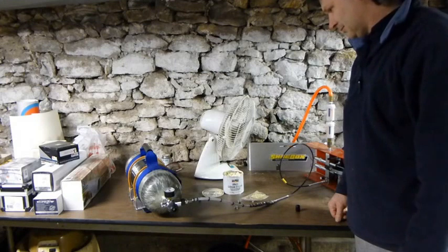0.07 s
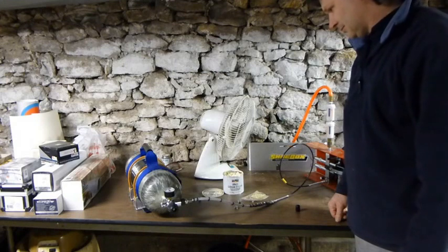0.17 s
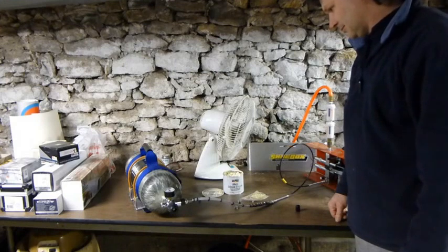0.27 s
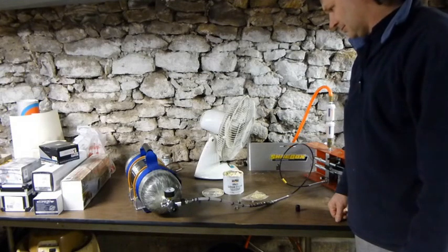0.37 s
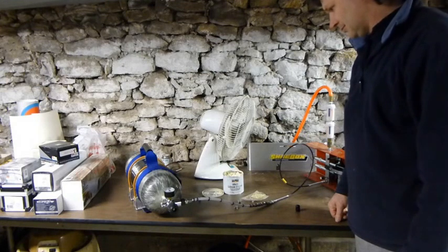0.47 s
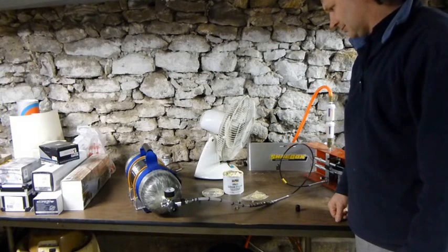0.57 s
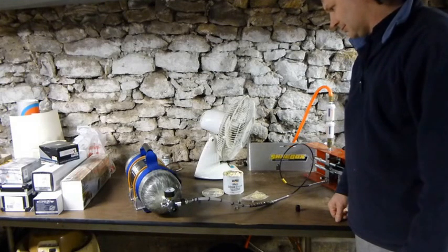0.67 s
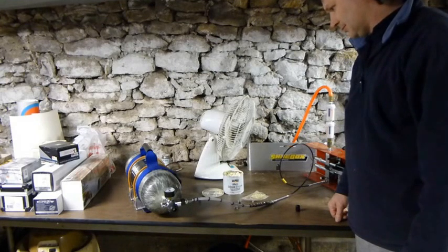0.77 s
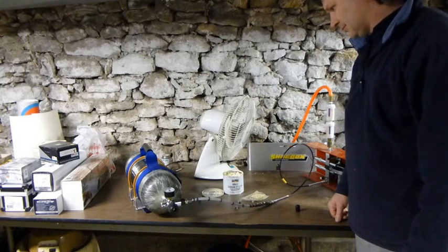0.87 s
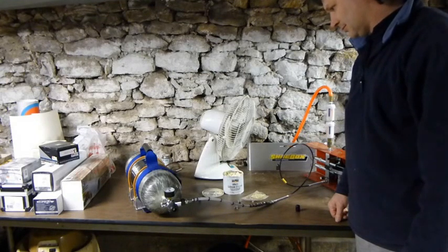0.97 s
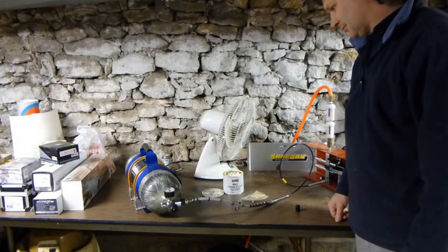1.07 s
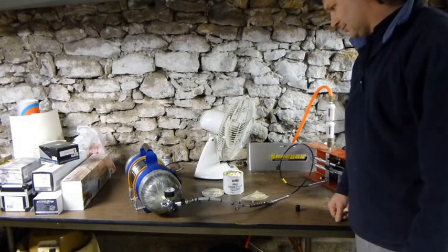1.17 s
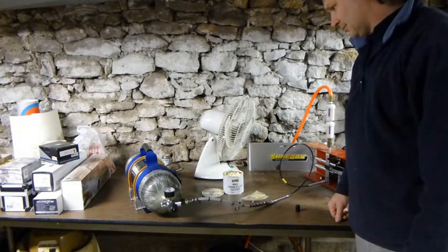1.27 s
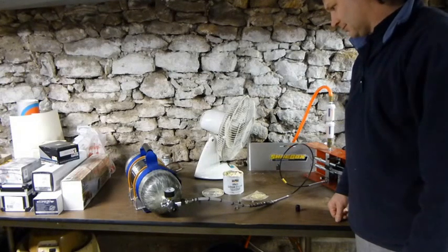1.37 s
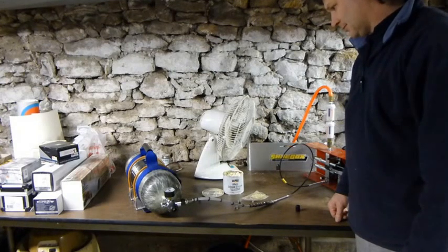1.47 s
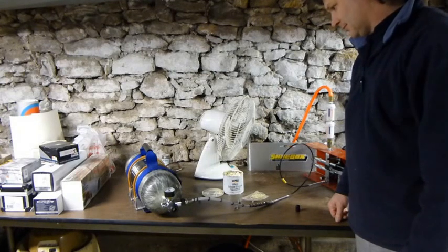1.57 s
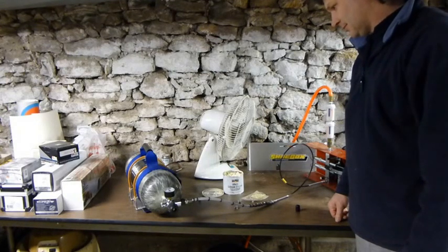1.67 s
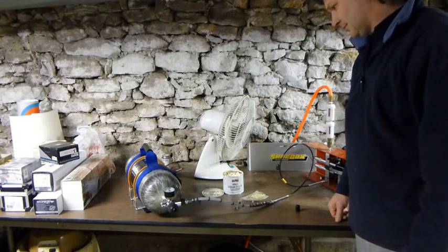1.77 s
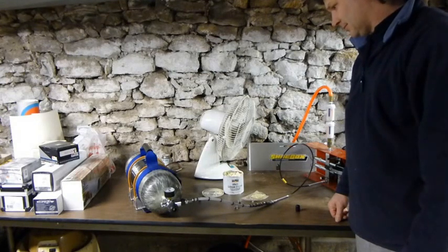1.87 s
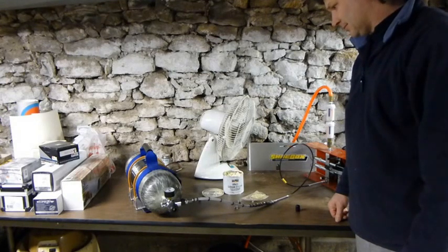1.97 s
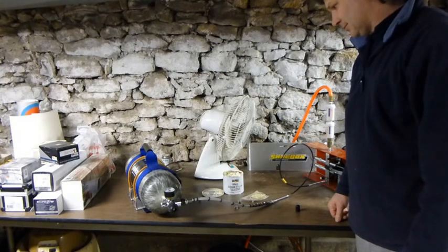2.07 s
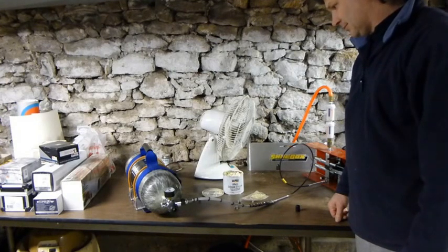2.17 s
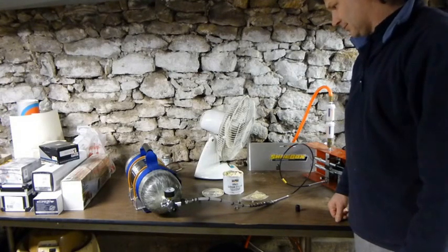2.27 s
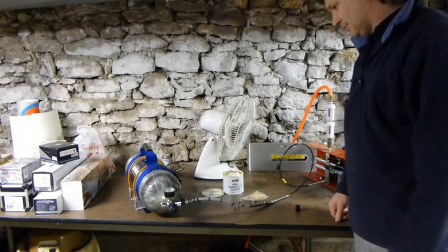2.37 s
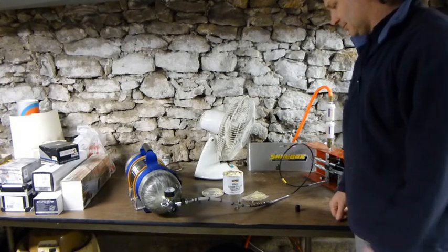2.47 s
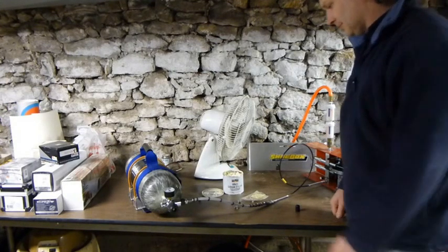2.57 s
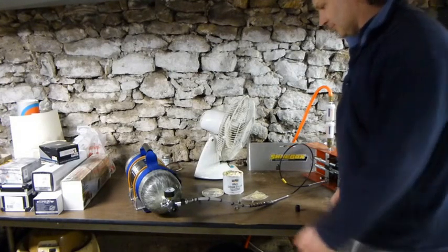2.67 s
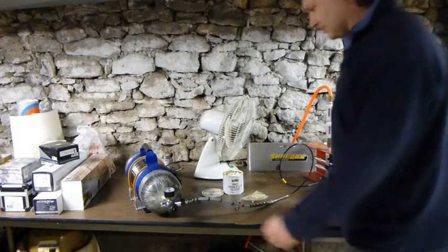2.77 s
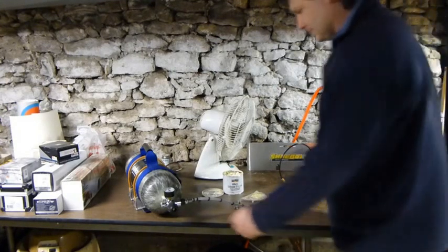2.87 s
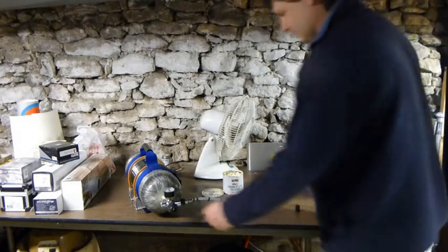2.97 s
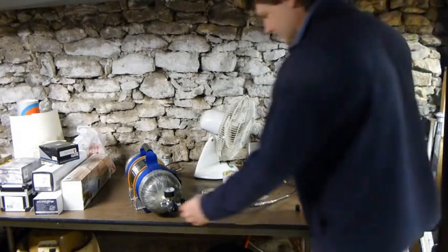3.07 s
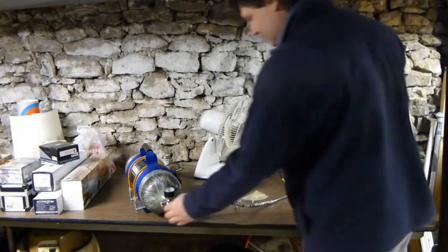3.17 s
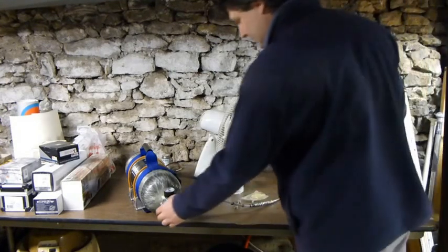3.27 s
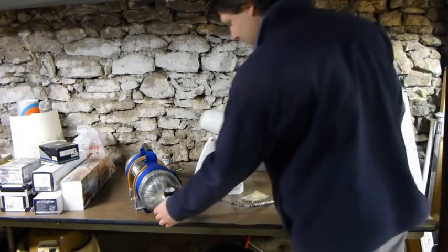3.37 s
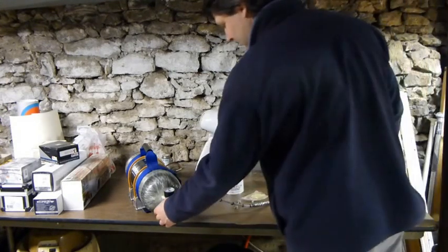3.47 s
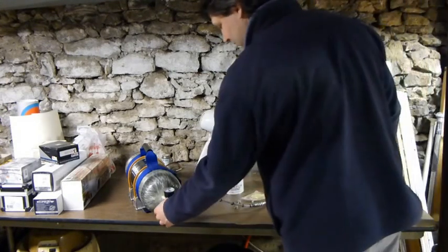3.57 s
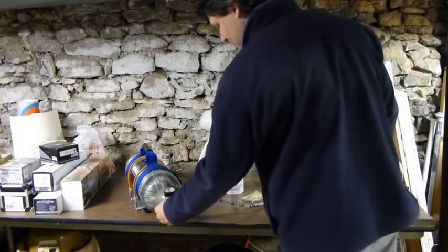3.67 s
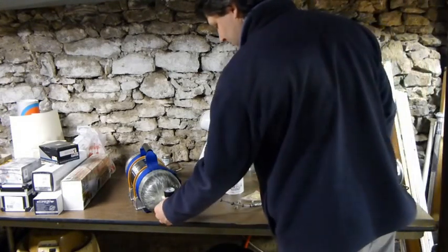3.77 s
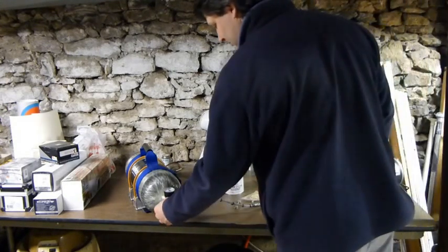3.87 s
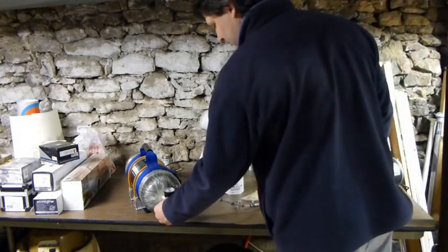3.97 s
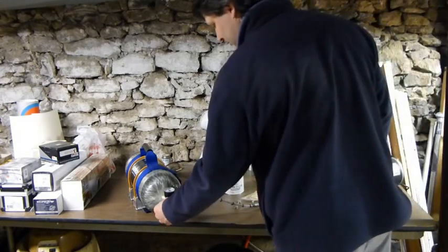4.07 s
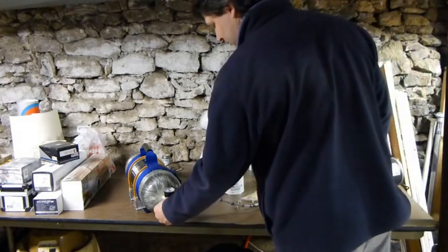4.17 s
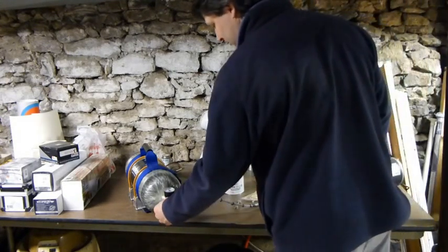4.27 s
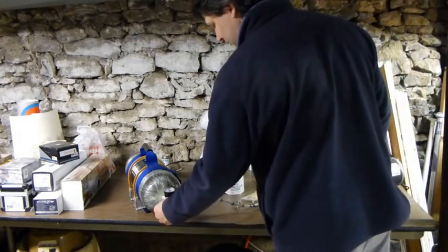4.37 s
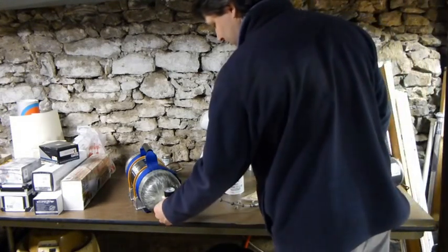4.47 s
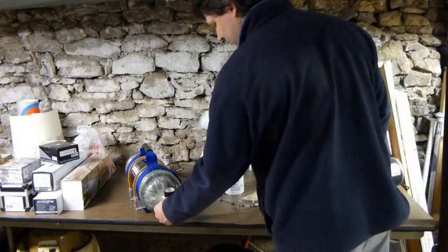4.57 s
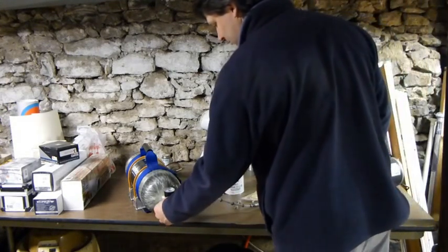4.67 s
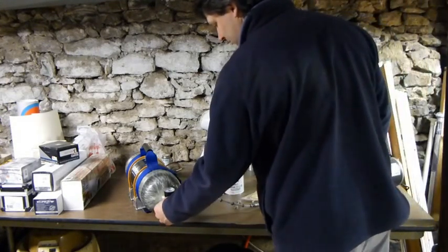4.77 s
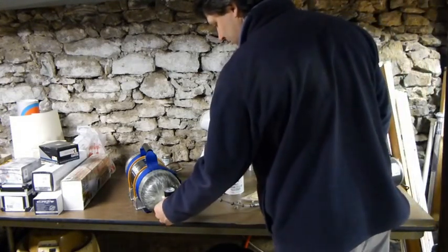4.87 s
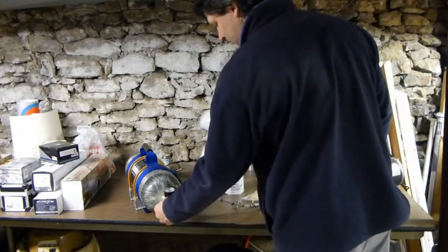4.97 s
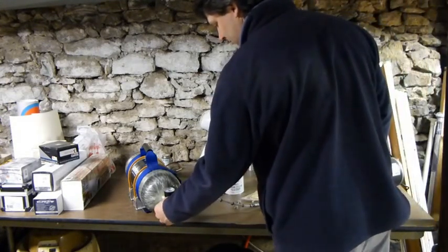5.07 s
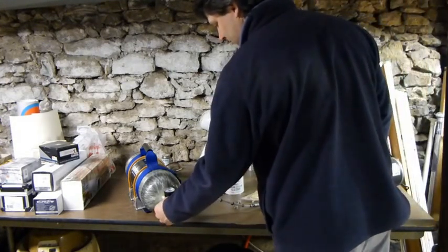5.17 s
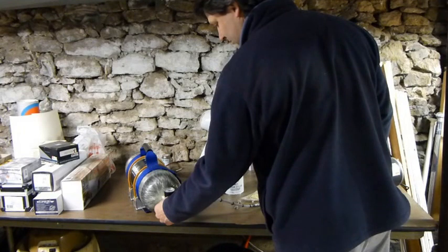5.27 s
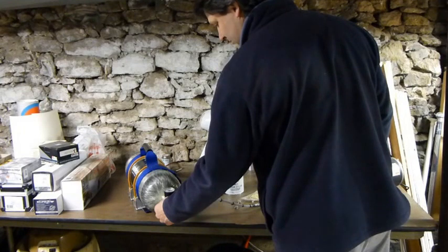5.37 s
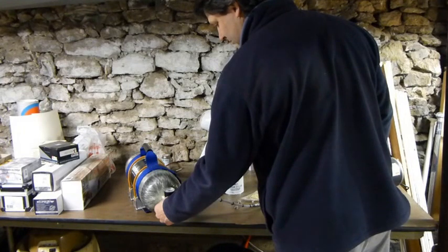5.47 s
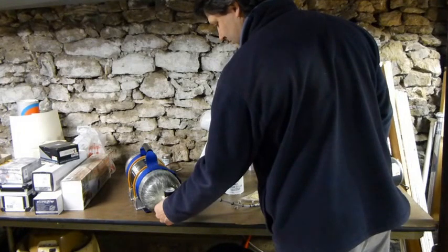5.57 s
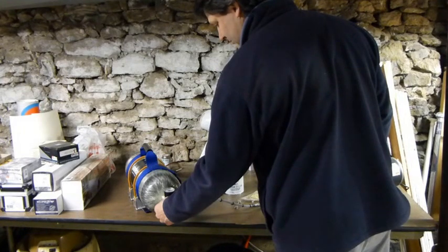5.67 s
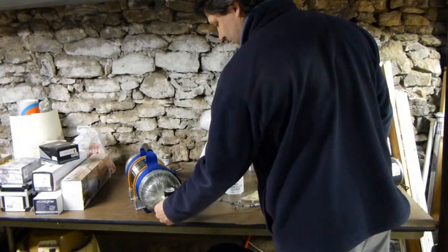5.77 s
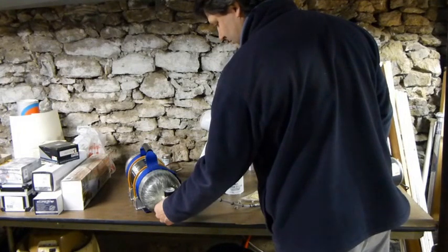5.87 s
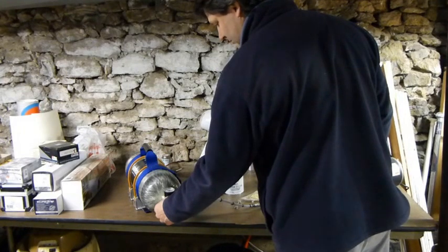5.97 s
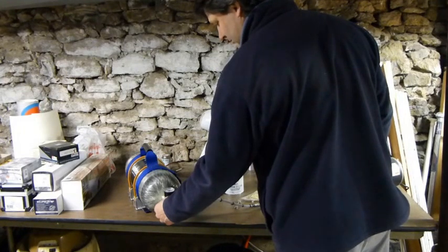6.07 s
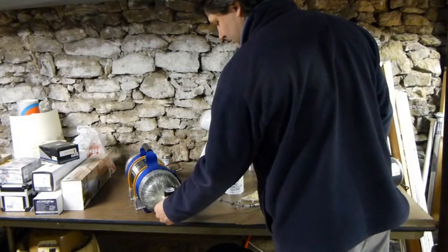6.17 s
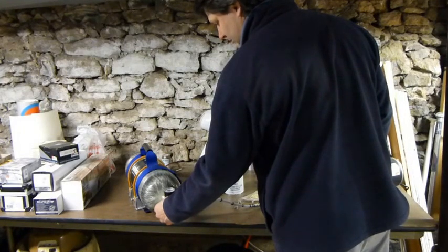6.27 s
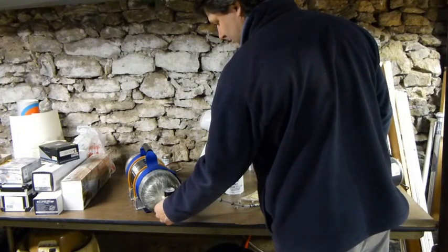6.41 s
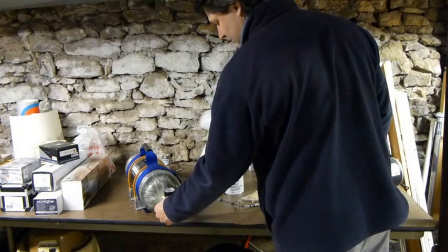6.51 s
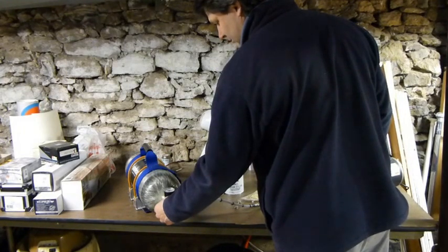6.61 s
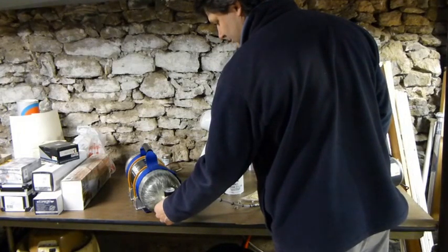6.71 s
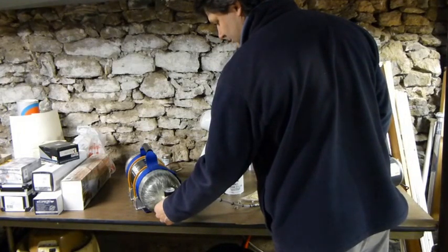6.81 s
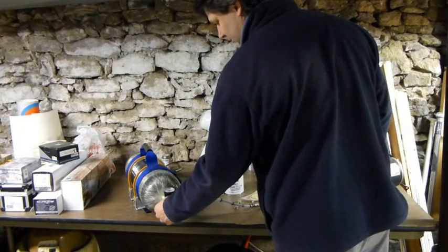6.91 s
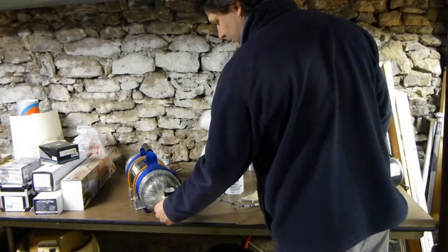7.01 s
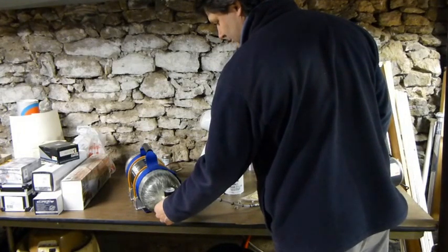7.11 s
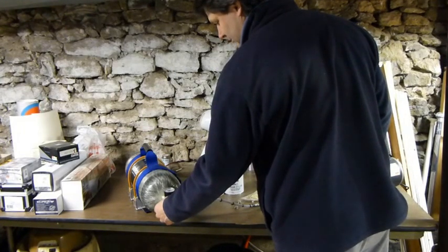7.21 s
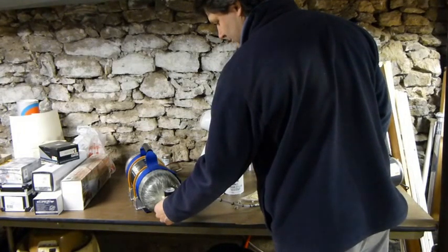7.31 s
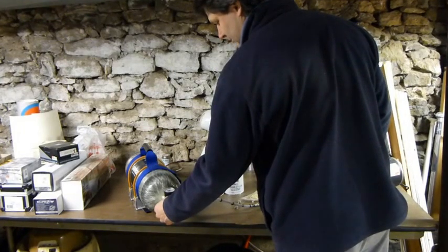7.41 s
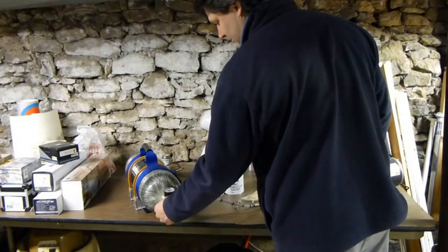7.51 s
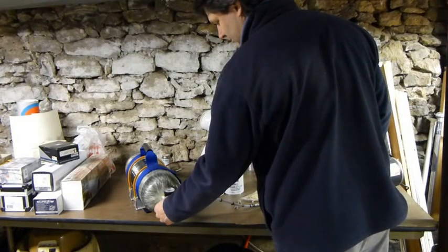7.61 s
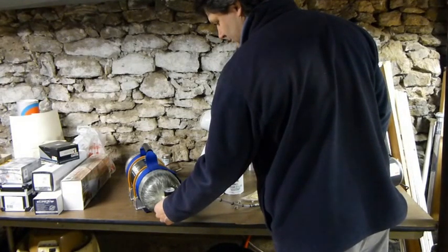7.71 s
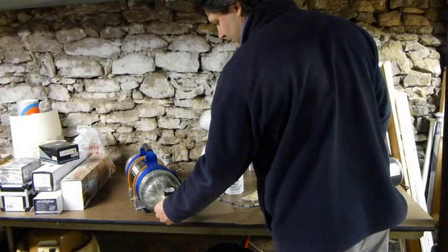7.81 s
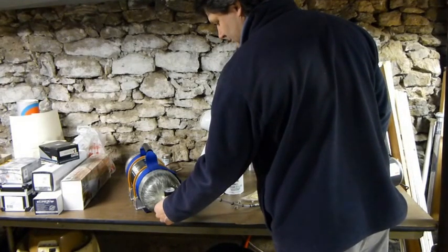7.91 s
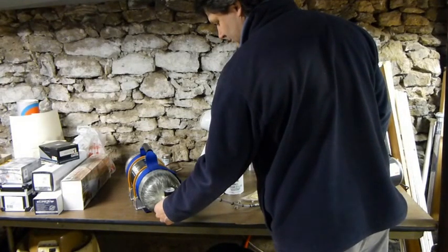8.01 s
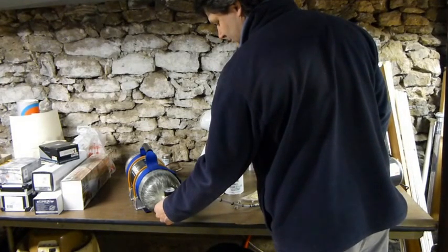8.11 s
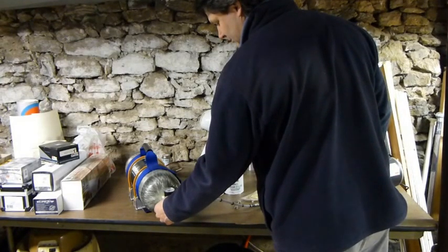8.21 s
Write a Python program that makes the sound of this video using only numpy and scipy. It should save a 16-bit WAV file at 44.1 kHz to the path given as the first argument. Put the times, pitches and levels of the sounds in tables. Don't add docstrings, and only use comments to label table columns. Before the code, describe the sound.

A camera microphone sits near the bench in a stone-walled workshop with a short, close reverberation. From 0 s a thin, fairly quiet leak of compressed air hisses, with small wet spits at about 0.3, 0.5, 0.8, 1.1 and 1.7 s. It eases steadily, dropping faster after 2 s and nearly spent by 4 s. Shoes scuff a gritty floor: a soft scuff at 2.5 s, quick steps around 2.9-3.1 s, then a longer drag until 3.6 s. At 4.1 s a valve opens and a loud, bright, turbulent jet starts within a tenth of a second. It sags slightly by 5 s, holds, then weakens clearly after 6.1 s, with small surges at 6.7, 7.75 and 8.2 s, remaining a softer hiss at the end. A faint high whistle colours the air; a weak motor hum and dull room air lie beneath.

```python
import sys
import numpy as np
from scipy import signal
from scipy.fft import rfft, irfft
from scipy.io import wavfile

SR = 44100
rng = np.random.default_rng(int(sys.argv[2]) if len(sys.argv) > 2 else 0)


def put_to_file(sound):
    columns = np.atleast_2d(sound).T
    safe = np.clip(columns, -1, 1)
    whole_steps = np.round(safe * 32767)
    wavfile.write(sys.argv[1], SR, whole_steps.astype(np.int16))


def boost(x):
    u = np.asarray(x, float) / 20
    return 10 ** u


N = 363825
SECONDS = np.arange(N) / SR

# time_s, level_db
TANK_PRESSURE = [
    (4.2, 1),
    (4.35, -0.1),
    (4.95, -2),
    (5.5, -1.74),
    (6.1, -2.5),
    (6.6, -6.5),
    (7.2, -9.5),
    (7.65, -12),
    (8.25, -13),
]


def tank_pressure_db():
    return in_time(TANK_PRESSURE)


def opening_db(lag_s):
    open_s, opening_s, curve = 4.098, 0.09, 1.6
    turned = np.clip((SECONDS - open_s - lag_s) / opening_s, 1e-3, 1)
    return 40 * curve * np.log10(np.sin(np.pi / 2 * turned))


# freq_hz, density_db (per Hz)
BLEED_HISS = [(320, -57.5), (540, -33), (660, -17.5), (760, -24.5), (850, -14.5), (960, -22), (1200, -17.5),
              (2340, -13.5), (3500, -7), (4900, -3), (6100, 1), (9000, 5), (12600, 4.5), (15400, -3)]
# centre_hz, width_hz, peak_db
BLEED_REFLECTIONS = [(1100, 300, -3.4), (1388, 95, 4.1), (1651, 87, 4.2), (1760, 45, -5.5), (1865, 45, 6.0),
                     (2294, 45, -6.3), (2736, 57, -4.1), (2856, 58, 5.0), (3425, 45, -5.4),
                     (3734, 45, -3.4), (3858, 77, 3.4), (4843, 57, 8.0), (5885, 45, -5.8), (6965, 45, 5.3),
                     (7527, 45, -6.2), (7997, 45, 5.6), (8734, 53, -5.4), (8982, 190, 3.8),
                     (9711, 45, -5.4), (11381, 62, 6.1), (11541, 64, -4.6), (11682, 45, 5.4),
                     (12289, 45, 5.5), (12416, 45, -5.2), (12559, 92, -5.4), (12720, 45, 4.0),
                     (12825, 63, -4.9), (13001, 92, 8.6), (13735, 55, -6.2), (14165, 68, 5.7)]
# start_db, follow_share (of the pressure fall), shift_db (per dB of pressure above choking)
BLEED_RESPONSE = [(-52.5, 0.7, 0), (-51.5, 0.63, 0.014), (-42.5, 0.48, 0.91), (-34.5, 0.9, 0.093),
                  (-34.5, 1.12, 0), (-33.5, .6, 0.13)]
BLEED_LAGS = [0.0047, 0.0051, -0.0014, 0.0055, 0.0066, 0.001]
# time_s, boost_db
VALVE_SURGES = [
    (6.7, 0.8),
    (7.36, 0.3),
    (7.75, 2.5),
    (8.19, 2.5),
]


def bleed_jet():
    surge_db = swells_db(VALVE_SURGES, half_s=0.078)
    surge_shares = [.1, 0.34, 1, 0.96, 0.55, 0.22]
    pressed_db = band_levels(tank_pressure_db(), BLEED_RESPONSE, choke_db=-2.5)
    levels_db = []
    for level_db, lag_s, share in zip(pressed_db, BLEED_LAGS, surge_shares):
        levels_db.append(level_db + opening_db(lag_s) + share * surge_db)
    return jet(levels_db, BLEED_HISS, BLEED_REFLECTIONS, flutter_db=.45, patchy_db=.5)


# time_s, level_db
LINE_PRESSURE = [
    (0, 0),
    (.8, -1.8),
    (1.8, -4.5),
    (2.5, -8.5),
    (3.0, -11),
    (3.45, -14),
    (3.68, -16.5),
    (3.95, -19),
    (4.3, -18),
]
# freq_hz, density_db (per Hz)
LEAK_HISS = [(400, -37), (700, -15.5), (1700, -7), (2500, -5.5), (3000, -2), (3900, 0), (5500, -3),
             (6200, -11), (7700, -12), (10800, -11.5), (12000, -10), (13600, -4.5), (14700, 2), (15600, -5)]
# centre_hz, width_hz, peak_db
LEAK_REFLECTIONS = [(1734, 45, -5.4), (2347, 71, 5.5), (2714, 45, -5.9), (2811, 45, 6.2), (3063, 45, -5.8),
                    (3209, 87, 5.5), (3826, 45, 9.4), (3934, 77, -5.6), (4833, 45, 5.2), (5143, 45, -7.2),
                    (5397, 51, 4.8), (5681, 141, 5.0), (6314, 69, -13.2), (7114, 45, 5.4), (7310, 45, 6.9),
                    (7509, 96, -7.7), (8923, 187, 4.5), (10563, 55, 4.5), (10846, 45, -7.7),
                    (11066, 89, -5.4), (11295, 88, 4.6), (11681, 45, 7.9), (12024, 118, -3.6),
                    (12215, 129, 3.8), (12349, 45, -4.7), (12862, 61, -5.1), (13291, 45, -5.8),
                    (14415, 68, 5.3), (14833, 58, 5.5), (15149, 70, -6.9)]
# start_db, follow_share (of the pressure fall), shift_db (per dB of pressure above choking)
LEAK_RESPONSE = [(-59.5, 0.74, -1.4), (-51, 0.94, -2.5), (-49, 0.93, -1.43), (-52.5, 0.91, 0),
                 (-52.5, 1.07, 0.5), (-47.5, 0.95, 0.7)]
# time_s, boost_db
DROPLETS = [
    (.295, 3.5),
    (.535, 5.5),
    (.81, 2.5),
    (.855, 4),
    (1.11, 2.5),
    (1.69, 4),
    (1.74, 0),
    (2.28, 2),
]


def leak_jet():
    spit_db = swells_db(DROPLETS, half_s=0.016)
    spit_shares = [0.29, .9, 1, 0.43, .15, .1]
    pressed_db = band_levels(in_time(LINE_PRESSURE), LEAK_RESPONSE, choke_db=-4)
    levels_db = [level_db + share * spit_db for level_db, share in zip(pressed_db, spit_shares)]
    return jet(levels_db, LEAK_HISS, LEAK_REFLECTIONS, flutter_db=.35, patchy_db=.3)


def band_levels(pressure_db, bands, choke_db):
    choked_db = np.maximum(pressure_db - choke_db, 0)
    return [start_db + follows * pressure_db + shift * choked_db for start_db, follows, shift in bands]


def swells_db(events, half_s):
    return sum(boost_db * np.exp(-((SECONDS - s) / half_s) ** 2) for s, boost_db in events)


JET_EDGES = [2400, 3600, 5900, 10500, 13400]


def jet(levels_db, colour, comb, flutter_db, patchy_db):
    hz, gain = response(colour, comb)
    sound = stereo_noise(side_db=-11.5, tilt_db=-1.4) * gain * workshop(wet_db=-7.0, t60=.17)
    above = [1, *(1 / (1 + (edge / hz) ** 40) for edge in JET_EDGES), 0]
    flow_db = flutter_db * (drift(7) + .6 * drift(25))
    out = 0
    for low, high, level_db in zip(above, above[1:], levels_db):
        band = rms_one(irfft(sound * (low - high), N))
        out = out + band * boost(level_db + flow_db + patchy_db * drift(6.7))
    return out


def workshop(wet_db, t60):
    decay = boost(-60 * np.minimum(SECONDS, 2) / t60)
    tail = rng.standard_normal(N) * decay * (SECONDS > .004)
    return 1 + boost(wet_db) * rfft(tail / np.sqrt(np.sum(tail ** 2)))


def whistle():
    hz = np.fft.rfftfreq(N, 1 / SR)
    resonance = 1 / (1 + (2 * (hz - 2860) / 70) ** 2)
    tone = rms_one(irfft(stereo_noise(side_db=-13.0) * resonance, N))
    from_s, rise_s = 1.1, 1.1
    seep = np.clip((SECONDS - from_s) / rise_s, 0, 1) * boost(-72.5)
    blown = boost(-62 + tank_pressure_db() + opening_db(0))
    return (seep + blown) * tone


# freq_hz, density_db (per Hz)
GRIT_COLOUR = [(120, -52), (200, -16), (312, -7.5), (383, -31), (504, -6.5), (858, -13), (1050, -20),
               (1700, -14.5), (2020, -17), (4010, -16), (12000, -24), (15600, -49), (22000, -120)]
# centre_hz, width_hz, peak_db
SOLE_RESONANCES = [(485, 68, 13.5), (634, 36, 11), (1054, 38, 13.5), (1190, 86, 10), (1411, 42, 16),
                   (1816, 40, 10), (2230, 60, 11.5)]
# start_s, length_s, grit_db, thud_db (against grit), rub_db (against grit)
SHOE_STROKES = [
    (2.476, .15, -57.5, -12, -9),
    (2.865, 0.096, -53.5, -9, -6),
    (2.947, .065, -54, -3, -6),
    (3.018, 0.075, -59, -3, -1.5),
    (3.153, 0.49, -51, -8, -5.5),
]


def shoes():
    hz, gain = response(GRIT_COLOUR, SOLE_RESONANCES)
    sound = stereo_noise(side_db=-14.0) * gain
    over_thud, over_rub = (1 / (1 + (edge / hz) ** 8) for edge in (750, 2000))
    shares = [1 - over_thud, over_thud - over_rub, over_rub]
    thud, rub, grit = (rms_one(irfft(sound * share, N)) for share in shares)
    grain = boost(1.5 * drift(40))
    out = 0
    for start_s, length_s, grit_db, thud_db, rub_db in SHOE_STROKES:
        drag = stroke(start_s, length_s, fade_db=-12) * (grit + boost(rub_db) * rub)
        weight = stroke(start_s + 0.022 * length_s, length_s, fade_db=-19) * boost(thud_db) * thud
        out = out + boost(grit_db) * (drag + weight)
    return grain * out


def stroke(start_s, length_s, fade_db):
    press_share, lift_share = 0.26, 0.2
    done = (SECONDS - start_s) / length_s
    press = np.clip(done / press_share, 0, 1)
    lift = np.clip((1 - done) / lift_share, 0, 1)
    return press * lift * boost(fade_db * np.clip(done - press_share, 0, 1))


# pitch_hz, level_db (rms)
MOTOR_LINES = [(118.4, -82), (236.9, -84), (355.3, -82), (414.5, -73), (473.7, -78)]


def motor():
    out = 0
    for hz, level_db in MOTOR_LINES:
        turns = hz * SECONDS + rng.random() + .05 * drift(4)
        out = out + boost(level_db + 3 + 1.3 * drift(2.5)) * np.sin(2 * np.pi * turns)
    return out


# freq_hz, density_db (per Hz)
AIR_COLOUR = [(8.8, -29.5), (15, -10), (34, -26.5), (55, -26.5), (74, -28), (127, -25), (227, -23.5),
              (303, -23), (412, -18), (530, -24), (643, -20.5), (982, -27), (1500, -27), (1950, -65),
              (3300, -120)]


def room_air():
    hz, gain = response(AIR_COLOUR)
    fall = 1 / (1 + (hz / 2500) ** 4)
    return boost(-58.5 - 9.5) * rms_one(irfft(stereo_noise(side_db=-10.0) * gain * fall, N))


def rms_one(x):
    return x / np.sqrt(np.mean(x ** 2) + 1e-20)


def in_time(rows):
    s, level = np.transpose(rows)
    return np.interp(SECONDS, s, level)


def drift(rate_hz):
    r = np.exp(-80 * np.pi * rate_hz / SR)
    chance = rng.standard_normal(N // 40 + 2002)
    slow = signal.lfilter([1], [1, -2 * r, r * r], chance)[2000:]
    return np.interp(np.arange(N) / 40, np.arange(len(slow)), rms_one(slow))


def response(colour, peaks=()):
    hz = np.maximum(np.fft.rfftfreq(N, 1 / SR), 1)
    points = np.array(colour)
    level_db = np.interp(np.log(hz), np.log(points[:, 0]), points[:, 1])
    for centre_hz, width_hz, peak_db in peaks:
        level_db = level_db + peak_db / (1 + (2 * (hz - centre_hz) / width_hz) ** 2)
    return hz, boost(level_db)


def stereo_noise(side_db, tilt_db=0):
    mid, side = rfft(rng.standard_normal((2, N)))
    octaves = np.log2(np.clip(np.fft.rfftfreq(N, 1 / SR), 500, None) / 2000)
    return mid + boost(side_db + tilt_db * octaves) * side * [[1], [-1]]


def scene():
    return bleed_jet() + leak_jet() + whistle() + shoes() + motor() + room_air()


# freq_hz, limit_db
MUTE_LIMIT = [(60, -66.5), (90, -46), (130, -37.5), (180, -46.5), (250, -47), (500, -50.5), (1000, -42.5),
              (2200, -37.5), (3500, -34.5), (6000, -50), (15000, -48)]


def band_dropouts(x, follow):
    hz, _, frames = signal.stft(x, SR, "cosine", nperseg=2048, noverlap=1024)
    power = np.abs(frames.mean(axis=0)) ** 2
    loud_db = 10 * np.log10(power.sum(axis=0) + 1e-12)
    band_power = power[:-1].reshape(256, 4, -1).sum(axis=1)
    band_db = 10 * np.log10(np.repeat(band_power, 4, axis=0) + 1e-14)
    points = np.array(MUTE_LIMIT)
    limit_db = np.interp(np.log(hz[:-1] + 1), np.log(points[:, 0]), points[:, 1])[:, None]
    keep = band_db > limit_db + follow * (loud_db + 40) - 40
    frames[:, :-1] *= keep / (1 + (hz[:-1, None] / 15560) ** 300)
    return signal.istft(frames, SR, "cosine", nperseg=2048, noverlap=1024)[1][:, :N]


def top_cut(x):
    return signal.sosfilt(signal.butter(12, 15720, fs=SR, output="sos"), x)


def record(dry):
    mix = band_dropouts(dry, follow=.6) - .0015
    return top_cut(mix)


dry = scene()
out = record(dry)
put_to_file(out)
```